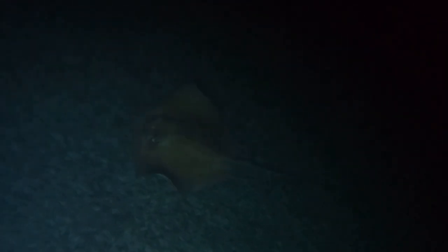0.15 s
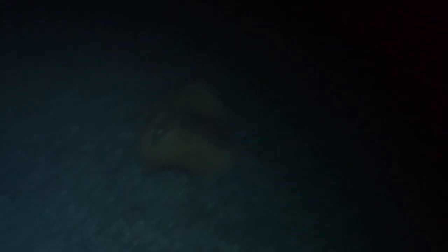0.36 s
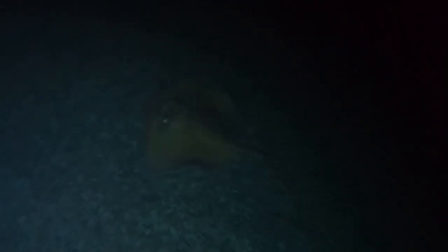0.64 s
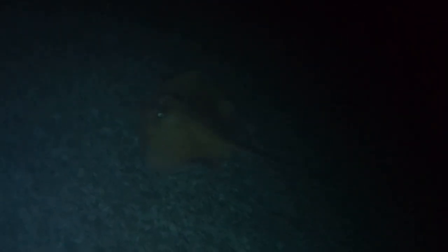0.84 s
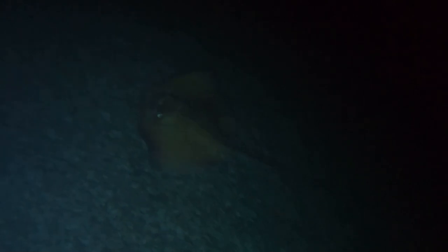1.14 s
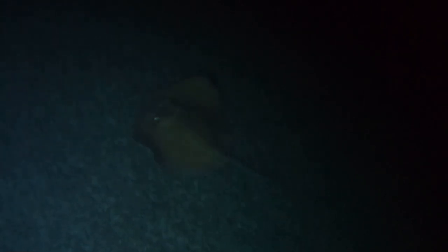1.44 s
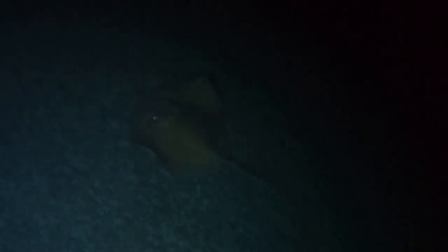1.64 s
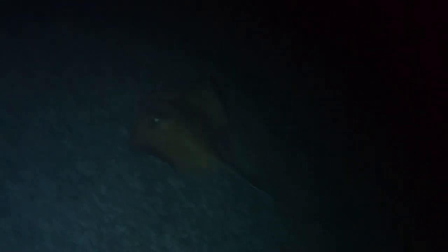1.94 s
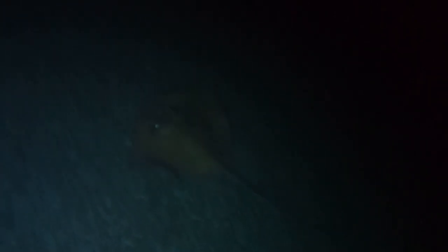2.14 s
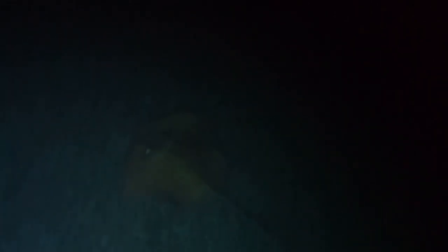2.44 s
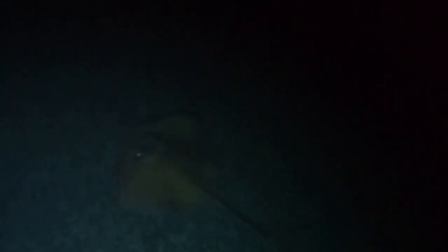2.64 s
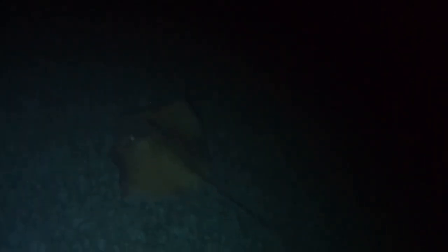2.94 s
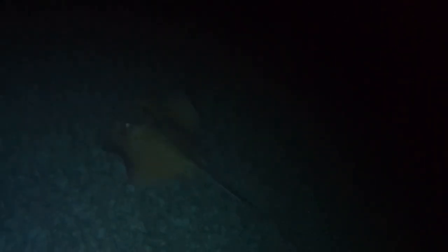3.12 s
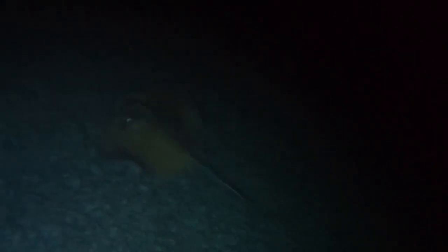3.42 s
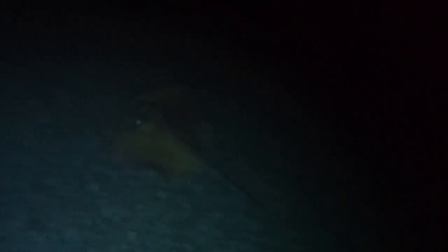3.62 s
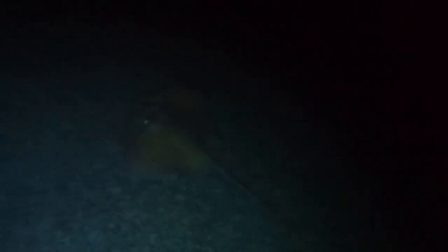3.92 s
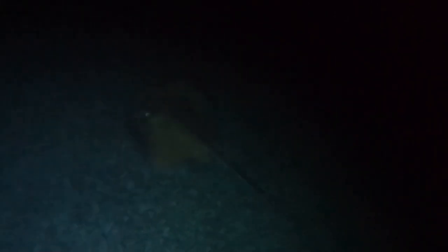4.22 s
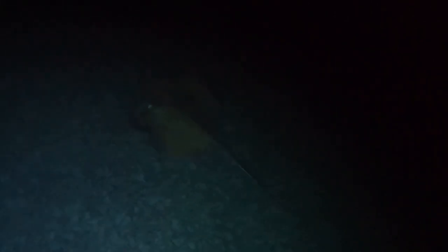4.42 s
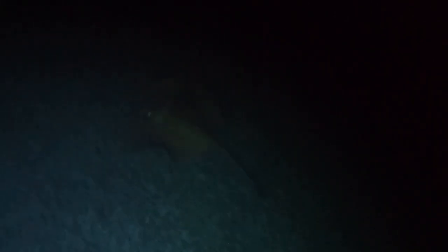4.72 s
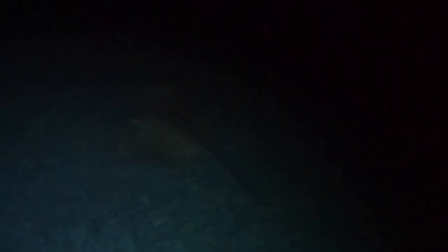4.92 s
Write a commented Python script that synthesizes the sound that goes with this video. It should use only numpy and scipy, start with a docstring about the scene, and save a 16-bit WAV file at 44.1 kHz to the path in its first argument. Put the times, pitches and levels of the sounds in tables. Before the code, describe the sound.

Close, hollow water laps and plops knock on a small boat's hull over a soft dull wash and unsteady deep rumble.

```python
"""Small waves lap against a kayak drifting on calm water at night.
From the start a low rumble surges and a dull wash of shaped noise, ripples and fizz sways underneath.
Faint drips are scattered throughout, and clearer droplets tick on the deck. Then laps come: each slaps
the hull, traps air that rings, flicks a droplet and gurgles as it falls back, and the hull softly thuds.
Sloshes of many small bubbles come around the laps; the wash slowly calms, and the rumble swells at the end."""
import sys
import numpy as np
from scipy import signal
from scipy.fft import rfft, irfft
from scipy.io import wavfile

SR = 44100
rng = np.random.default_rng(int(sys.argv[2]) if len(sys.argv) > 2 else 0)


def generate_wav(signal):
    """Clip the signal to [-1, 1] and save it as 16-bit WAV at the path in sys.argv[1]."""
    frames = np.transpose(np.atleast_2d(signal))
    scaled = np.clip(frames, -1, 1) * 32767
    pcm = np.round(scaled).astype(np.int16)
    wavfile.write(sys.argv[1], SR, pcm)


N = 223401
TIME = np.arange(N) / SR


def gain_of(db):
    """Turns decibels into amplitude."""
    return 10 ** (np.asarray(db) / 20)


def evened(x):
    """Scales a sound to an rms (average strength) of 1."""
    return x / np.sqrt(np.mean(x ** 2) + 1e-20)


def add(mix, s, sound):
    """Mixes a sound in, starting at time s in seconds."""
    part = mix[max(round(s * SR), 0):][:len(sound)]
    part += sound[:len(part)]


GURGLE_DB, GURGLE_HZ = 13, 612  # one larger bubble after each slap, this far above the backwash
SINK_DB, SINK_HZ = 8, 198  # the hull settles with the gurgle, this far above the backwash
BACKWASH_AHEAD_S, BACKWASH_HZ, BACKWASH_OCTAVES = 0.0083, 399, .68  # small bubbles start just before the gurgle
FLICK_S, FLICK_DB, FLICK_HZ, FLICK_SPREAD = 0.0093, -56, 5200, .6  # thrown droplet: delay, level against the slap
# The laps, and two weaker bloops that closely follow a lap; levels are before the band limit.
# Each row: time of the slap in seconds, slap level in dB, air pocket level in dB, air pocket pitch in Hz,
# air pocket life in seconds, hull ring level in dB, wait until the water falls back in seconds,
# backwash level in dB, backwash length in seconds.
LAP_EVENTS = [(0.3601, -24, -41, 1336, .012, -33.5, 0.028, -50.5, 0.019),
              (0.4349, -15, -14.5, 1355, 0.0053, -21.5, 0.028, -50, .04),
              (0.5818, -14, -25, 1120, 0.011, -33, .014, -45.5, 0.012),
              (0.8643, -19, -28, 1158, 0.0076, -34.5, 0.028, -61, .04),
              (1.4888, -15, -24.5, 1117, 0.0096, -32, 0.049, -52, 0.025),
              (1.791, -16, -32, 1135, 0.0043, -32, .026, -45.5, 0.045),
              (2.2773, -17, -13, 1386, 0.006, -19, .035, -53.5, .04),
              (2.457, -12.5, -25, 1145, 0.0066, -30.5, .021, -50, .04),
              (2.4717, -25, -28.5, 1153, .0069, -42, 0.028, -49, .04),
              (2.777, -14.5, -21.5, 1123, 0.002, -31.5, .035, -50.5, 0.042),
              (2.793, -38, -30, 1120, 0.0084, -33.5, 0.034, -55, .04),
              (3.223, -11, -19.5, 947, 0.007, -26.5, 0.039, -43, 0.14),
              (3.4362, -12, -31.5, 1167, 0.0095, -29.5, 0.034, -47, .012),
              (3.65, -10.7, -23.5, 1092, 0.0051, -30, 0.029, -40.5, .04),
              (3.8935, -12, -30, 1150, 0.0083, -29, 0.035, -43.5, .02),
              (4.3764, -13.5, -25, 1143, 0.0082, -31.5, 0.032, -40.5, .012),
              (4.8973, -17.5, -22, 1179, 0.0064, -30.5, 0.029, -38.5, .025)]


def laps():
    """Each lap slaps, flicks a droplet, then falls back with a soft push and one gurgle in a swarm of bubbles."""
    to_limit, unlimited = np.zeros((2, N))
    for s, slap_db, pocket_db, pocket_hz, life_s, hull_db, fall_s, back_db, back_s in LAP_EVENTS:
        add(to_limit, *lap(s, slap_db, pocket_db, pocket_hz, life_s, hull_db))
        gurgle_hz = GURGLE_HZ * 2 ** rng.uniform(-0.21, 0.27)
        gurgle = bubble(gurgle_hz, cycles=1.25, glide=0.05)
        add(to_limit, s + fall_s, gain_of(back_db + GURGLE_DB) * gurgle)
        sink = bubble(SINK_HZ, cycles=1.0, glide=0)
        add(unlimited, s + fall_s, gain_of(back_db + SINK_DB) * sink)
        flick = droplet(FLICK_HZ, FLICK_SPREAD)
        add(unlimited, s + FLICK_S, gain_of(slap_db + FLICK_DB) * flick)
        backwash = swarm(s + fall_s - BACKWASH_AHEAD_S, back_s, BACKWASH_HZ, BACKWASH_OCTAVES, crest=0.3)
        unlimited += gain_of(back_db) * backwash
    return band_limited(to_limit) + unlimited


def lap(s, slap_db, pocket_db, pocket_hz, life_s, hull_db, before_s=.04):
    """The water slaps, the hull and the trapped air ring, and a faint tone swells and fades around the slap."""
    t = np.arange(-before_s, 2 * before_s, 1 / SR)  # the slap is at zero
    after = np.maximum(t, 0)
    sound = gain_of(slap_db) * (slap(t, slap_db) + spray(after))
    sound += gain_of(pocket_db) * air_pocket(after, pocket_hz, life_s)
    sound += gain_of(hull_db) * (hull_ring(t, after) + faint_tone(t))
    return s - before_s, sound


SLAP_HZ, SLAP_USUAL_DB, SLAP_DB_PER_OCTAVE = 468, -13.5, 72


def slap(t, slap_db, overtone=0.66, slap_s=0.00082):
    """A very short pulse; a heavier slap wets more of the hull and sounds lower."""
    hz = SLAP_HZ * 2 ** ((SLAP_USUAL_DB - slap_db) / SLAP_DB_PER_OCTAVE)
    angle = 2 * np.pi * hz * t
    return (overtone * np.cos(2 * angle) - np.cos(angle)) * np.exp(-(t / slap_s) ** 2)


def spray(after, spray_db=-26, spray_s=0.0075):
    """The broken water churns for a moment after the slap: a short swell of noise."""
    middle_band = signal.butter(4, [300, 1150], "band", fs=SR, output="sos")
    churn = evened(signal.sosfilt(middle_band, rng.standard_normal(len(after))))
    return gain_of(spray_db) * churn * after / spray_s * np.exp(-after / spray_s)


def air_pocket(after, hz, life_s, choke=1.16, seal_s=0.00005, split_ratio=1.15, split_db=-21, split_s=0.0034):
    """Trapped air rings as it is sealed in, and dies ever faster as it collapses."""
    fade = (1 - np.exp(-after / seal_s)) * np.exp(-(after / life_s) ** choke)
    pocket = np.sin(2 * np.pi * hz * after) * fade
    # a smaller pocket splits off a moment later and rings higher
    split = np.sin(2 * np.pi * split_ratio * hz * after)
    split_swell = after / split_s * np.exp(1 - after / split_s)
    return pocket + gain_of(split_db) * split * split_swell


HULL_HZ = 569  # pitch before the rise


def hull_ring(t, after, rise=0.28, rise_s=0.0025, delay_s=0.0023, length_s=0.0053):
    """The gap between water and hull narrows, so its short ring rises in pitch and then settles."""
    turns = HULL_HZ * (t + rise * rise_s * np.log(np.cosh(after / rise_s)))
    return -np.cos(2 * np.pi * turns) / np.cosh((t - delay_s) / length_s)


def faint_tone(t, tone_db=-7, tone_hz=692, ahead_s=0.0069, length_s=0.0047):
    """A faint tone near 690 Hz swells and fades around each slap; its level is against the hull ring."""
    return gain_of(tone_db) * np.sin(2 * np.pi * tone_hz * t) / np.cosh((t + ahead_s) / length_s)


def band_limited(x, low_hz=200, high_hz=1450, leak_db=-20):
    """Band limit: keeps 200 to 1450 Hz, with a little treble left."""
    no_bass = signal.sosfiltfilt(signal.butter(2, low_hz, "high", fs=SR, output="sos"), x)
    dull = signal.sosfiltfilt(signal.butter(6, high_hz, fs=SR, output="sos"), no_bass)
    return dull + gain_of(leak_db) * no_bass


def bubble(hz, cycles, glide):
    """A damped ring that starts softly; with a glide it rises in pitch as the bubble nears the surface."""
    turns = np.arange(0, 6 * cycles, hz / SR)
    age = turns / cycles
    soft_start = 1 - np.exp(-(2 * turns) ** 2)
    ring = np.sin(2 * np.pi * turns * (1 + glide * age)) * np.exp(-age) * soft_start
    return ring / abs(ring).max()


def swarm(start, length, hz, octaves, crest, bubbles_per_s=900, size_spread_db=2, cycles=2.0):
    """Small bubbles thicken up to the crest (a share of the length) and thin out; rms 1 over that length."""
    out = np.zeros(N)
    for when, pitch, size, sign in rng.random((int(bubbles_per_s * length) + 1, 4)):
        if when < crest:
            place = np.sqrt(when * crest)
        else:
            place = 1 - np.sqrt((1 - when) * (1 - crest))
        # sqrt(12) turns an even spread of width 1 into one with a standard deviation of 1
        bubble_hz = hz * 2 ** (octaves * np.sqrt(12) * (pitch - .5))
        ring = bubble(bubble_hz, cycles, glide=0.017)
        level = np.sign(sign - .5) * gain_of(-size_spread_db * np.log(size))
        add(out, start + length * place, level * ring)
    return evened(out) * np.sqrt(length * SR / N)


# Sloshes around and after the laps, from deep churning to thin trickles.
# Each row: middle in seconds, length in seconds, rms level in dB, pitch in Hz, spread of pitch in octaves.
SLOSH_EVENTS = [(0.726, 0.12, -45, 106, 0.83), (0.849, 0.14, -72, 2350, .08),
                (1.989, .18, -66.5, 2600, .29), (2.058, 0.078, -50, 797, 0.36),
                (2.414, .035, -43, 477, 0.68), (2.47, 0.1202, -41.5, 189, 0.49),
                (3.119, 0.17, -44, 161, 0.34), (3.279, .05, -38.5, 570, 0.42),
                (3.798, 0.026, -38, 204, .65), (4.709, 0.14, -47.5, 275, 0.73),
                (4.923, .02, -35.5, 300, .7), (4.969, 0.0202, -39, 420, 0.59),
                (5.011, 0.0097, -35, 398, 0.52), (5.049, 0.043, -47.5, 485, 0.5)]


def sloshes():
    """Each slosh is a swarm of small bubbles that swells and fades almost evenly."""
    out = np.zeros(N)
    for middle, length, db, hz, octaves in SLOSH_EVENTS:
        out += gain_of(db) * swarm(middle - length / 2, length, hz, octaves, crest=0.44)
    return out


# Heavy thuds of the hull.
# Each row: start in seconds, peak level in dB, pitch in Hz.
THUD_EVENTS = [(0.437, -17, 115), (0.457, -22.5, 42), (.602, -22, 62), (0.674, -25.5, 54),
               (1.645, -28.5, 55), (2.419, -22.5, 65), (2.478, -21.5, 75), (2.853, -28.5, 87),
               (3.043, -28.5, 101), (3.926, -30.5, 74), (4.918, -21, 78), (5.013, -25, 90)]


def thuds():
    """Heavier water pushes the hull, which gives for a cycle or two."""
    out = np.zeros(N)
    for s, db, hz in THUD_EVENTS:
        add(out, s, gain_of(db) * bubble(hz, cycles=0.52, glide=0))
    return out


DRIPS_PER_S, DRIP_DB, DRIP_TILT_DB = 2.6, -57.5, -10.5  # faint drips all around; tilt in dB per octave
PING_SPREAD = 0.077  # share of the pitch
# Droplets that tick on the deck.
# Each row: time in seconds, level in dB, brightness in dB per octave.
DROP_EVENTS = [(.474, -53, -4), (1.068, -60, 3), (1.7534, -45.5, -2.5), (1.812, -54, 0), (2.251, -54, -4),
               (2.470, -53, -1), (3.317, -56, -9), (4.169, -49, -8), (4.345, -44.5, 1), (4.762, -54, -8)]
# Tiny bubbles that burst after a lap.
# Each row: time in seconds, peak level in dB, pitch in Hz.
PING_EVENTS = [(2.47, -56.5, 7020), (2.794, -69, 6730)]


def drops(ahead_s=.002):
    """Clear ticks on the deck, a random scatter of faint ones, and the pings of tiny bubbles."""
    out = np.zeros(N)
    for s, db, tilt_db in DROP_EVENTS:
        add(out, s - ahead_s, gain_of(db) * tick(tilt_db))
    for s, db, hz in PING_EVENTS:
        add(out, s - ahead_s, gain_of(db) * droplet(hz, PING_SPREAD))
    for share in rng.random(int(DRIPS_PER_S * N / SR)):
        add(out, share * N / SR, gain_of(DRIP_DB) * tick(DRIP_TILT_DB))
    return out


# Resonances of the deck under a droplet.
# Each row: pitch in Hz, level in dB, spread as a share of the pitch.
DECK_RESONANCES = [(1770, -4, .25), (2966, 0.5, 0.19), (4870, -10, 0.14), (9000, -27.5, 0.41)]


def tick(tilt_db, middle_hz=3000):
    """A droplet lands on the deck and sounds its resonances; a positive tilt favours the higher ones."""
    out = 0
    for hz, db, spread in DECK_RESONANCES:
        level_db = db + tilt_db * np.log2(hz / middle_hz)
        out = out + gain_of(level_db) * droplet(hz, spread)
    return out


def droplet(hz, spread, rise_s=0.0016):
    """A droplet bursts: a tiny spray of noise around one pitch."""
    t = np.arange(1024) / SR
    burst = rng.standard_normal(len(t)) * t / rise_s * np.exp(-t / rise_s)
    ratio = 1 + max(spread, .02)
    band = np.clip([hz / ratio, hz * ratio], 20, SR / 2 - 20)
    pitched = signal.sosfilt(signal.butter(3, band, "band", fs=SR, output="sos"), burst)
    return pitched / abs(pitched).max()


# How restless the water is; only the changes around the average count.
# Each row: time in seconds, level in dB.
RESTLESSNESS = [(0.02, -46.5), (0.76, -47), (1.27, -48), (1.79, -47), (2.31, -43), (2.71, -46), (3.22, -47),
                (4.73, -50), (4.85, -49.5)]


def sway_db():
    """The rise and fall of the water, in dB around its average."""
    level = np.interp(TIME, *np.transpose(RESTLESSNESS))
    return level - level.mean()


WASH_DB, WASH_FOLLOWS, WASH_CALMS_DB_PER_S = -46, 0.67, 0.45  # follows: share of the sway
# Colour of the wash, before the hollows of the boat are added.
# Each row: frequency in Hz, relative level in dB.
WASH_COLOUR = [(100, -27), (170, -2), (230, 5), (310, 0.5), (400, -3), (520, -1.5), (620, -7), (850, -5),
               (1080, -3.5), (1220, -17.5), (1430, -10.5), (1600, -30), (2000, -56.5), (4000, -82.5)]


def wash(ripples_per_s=260, ripple_share=0.56, ripple_spread_db=3):
    """Dull noise grained with countless ripples (random clicks) follows the sway as the water calms."""
    level_db = WASH_DB + WASH_FOLLOWS * sway_db() - WASH_CALMS_DB_PER_S * (TIME - TIME.mean())
    sizes = gain_of(ripple_spread_db * np.minimum(rng.exponential(1, N), 3)) * rng.choice([-1, 1], N)
    ripples = evened(sizes * (rng.random(N) < ripples_per_s / SR))
    grained = rng.standard_normal(N) + ripple_share * ripples
    return gain_of(level_db) * coloured(grained, WASH_COLOUR)


FIZZ_DB, FIZZ_FOLLOWS = -66.5, 0.68  # follows: share of the sway
# Colour of the fizz, before the hollows of the boat are added.
# Each row: frequency in Hz, relative level in dB.
FIZZ_COLOUR = [(1000, -3.5), (1600, -2), (2200, 3.5), (2500, -5.5), (3000, -1.5), (3700, -2), (4300, -13),
               (5000, -14.5), (6000, -19.5), (7100, -26), (7700, -37), (15000, -38)]


def fizz():
    """A faint hiss of treble noise follows the sway."""
    level_db = FIZZ_DB + FIZZ_FOLLOWS * sway_db()
    return gain_of(level_db) * coloured(rng.standard_normal(N), FIZZ_COLOUR)


# Loudness of the rumble over time.
# Each row: time in seconds, level in dB.
RUMBLE_LOUDNESS = [(0, -30.5), (0.7, -29.5), (1.1, -33.5), (2.2, -33), (2.43, -31), (2.7, -35.5),
                   (3.8, -34.5), (4.3, -40.5), (5.06, -33)]
# Colour of the rumble, before the hollows of the boat are added.
# Each row: frequency in Hz, relative level in dB.
RUMBLE_COLOUR = [(5, -0.5), (20, 2.5), (36, -3), (60, -6.5), (90, -16.5), (128, -13), (170, -28),
                 (300, -48), (700, -90)]


def rumble(surge_db=2, surge_s=0.019):
    """Low noise whose level surges at random, as slow, smoothed noise pushes it up and down."""
    hz = np.fft.rfftfreq(N, 1 / SR)
    surge = evened(irfft(rfft(rng.standard_normal(N)) * np.exp(-(hz * surge_s) ** 2), N))
    surging = gain_of(surge_db * surge) * coloured(rng.standard_normal(N), RUMBLE_COLOUR)
    level_db = np.interp(TIME, *np.transpose(RUMBLE_LOUDNESS))
    return gain_of(level_db) * evened(surging)


# Hollow resonances of the boat.
# Each row: centre in Hz, width in Hz, lift in dB.
BOAT_HOLLOWS = [(483, 56, 9.5), (745, 120, 6.5), (1333, 130, 2.5), (2150, 160, 2)]


def coloured(x, spectrum):
    """Gives x a spectrum and the hollow resonances of the boat, at rms 1."""
    hz = np.fft.rfftfreq(N, 1 / SR)
    f, db = np.transpose(spectrum)
    shape_db = np.interp(np.log(hz + 1), np.log(f), db)
    for centre, width, lift in BOAT_HOLLOWS:
        shape_db += lift / (1 + (2 * (hz - centre) / width) ** 2)
    return evened(irfft(rfft(x) * gain_of(shape_db), N))


def scene():
    """Everything is close by, in open air, so the sources are added without echo."""
    return (laps() + sloshes() + thuds() + drops() + wash() + fizz() + rumble())[None]


def record(dry, edge_hz=15100, fade_s=.003):
    """Fades both ends briefly and cuts the highest treble."""
    fade = np.minimum(np.minimum(TIME, TIME[::-1]) / fade_s, 1)
    treble_cut = signal.firwin(511, edge_hz, window=("kaiser", 9), fs=SR)
    return signal.oaconvolve(dry * fade, treble_cut[None], "same")


dry = scene()
out = record(dry)
generate_wav(out)
```